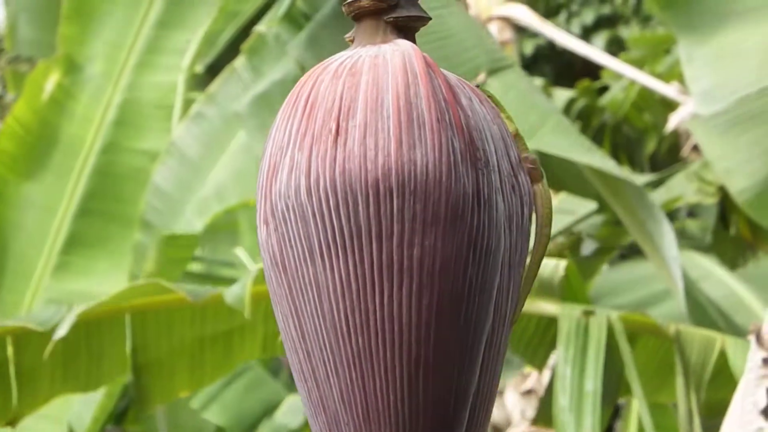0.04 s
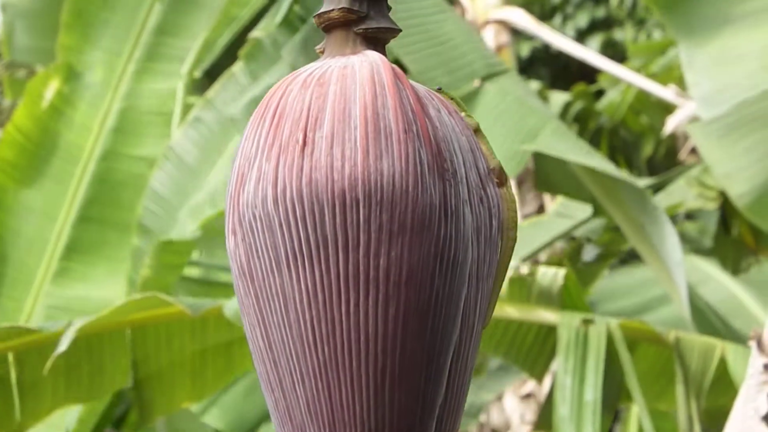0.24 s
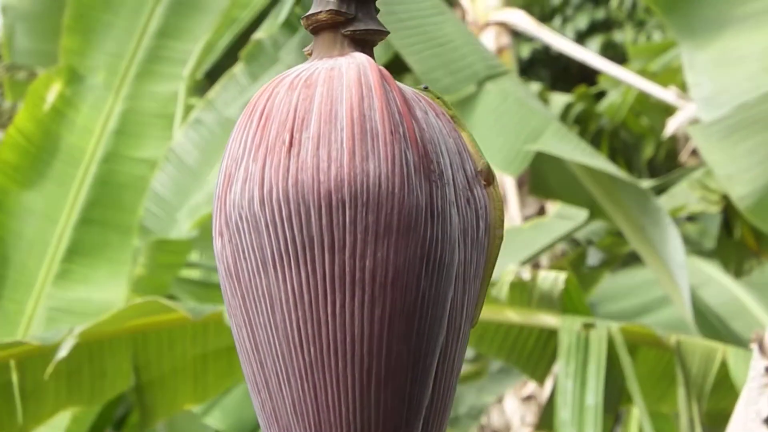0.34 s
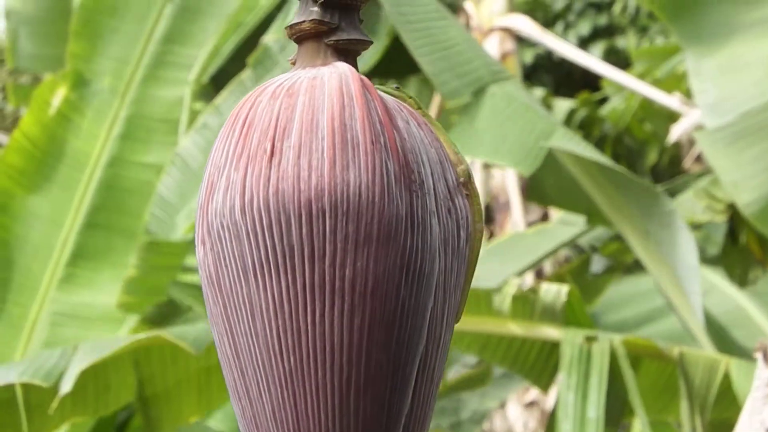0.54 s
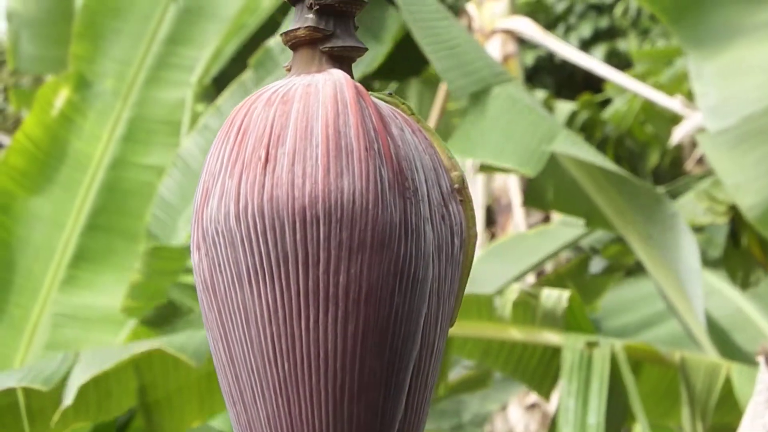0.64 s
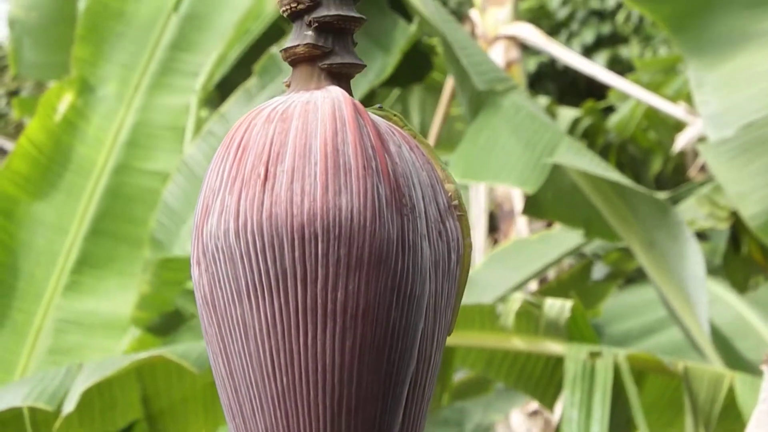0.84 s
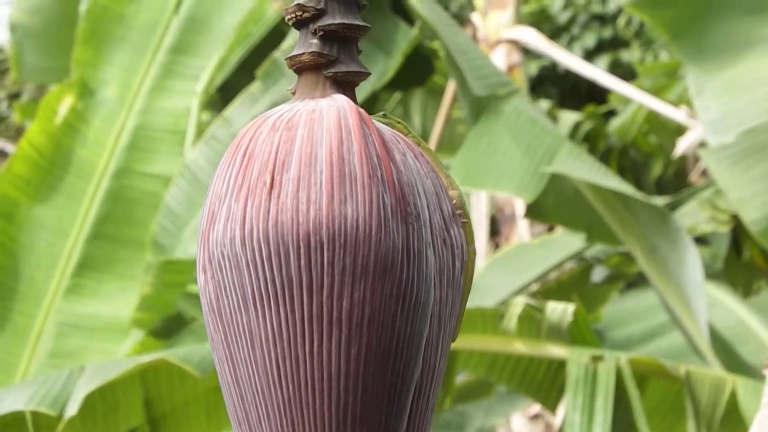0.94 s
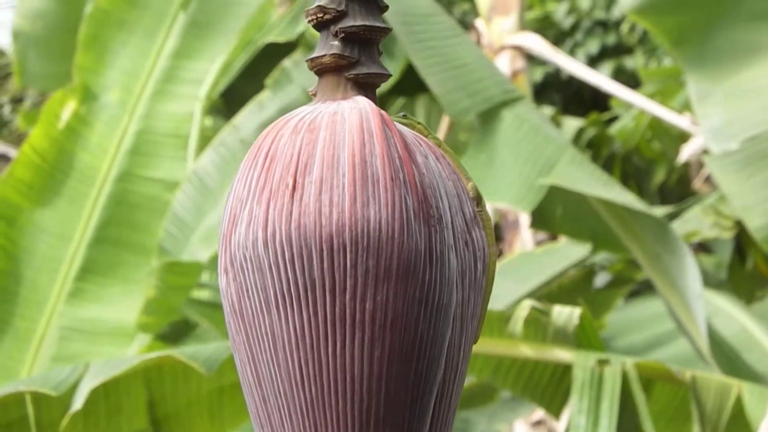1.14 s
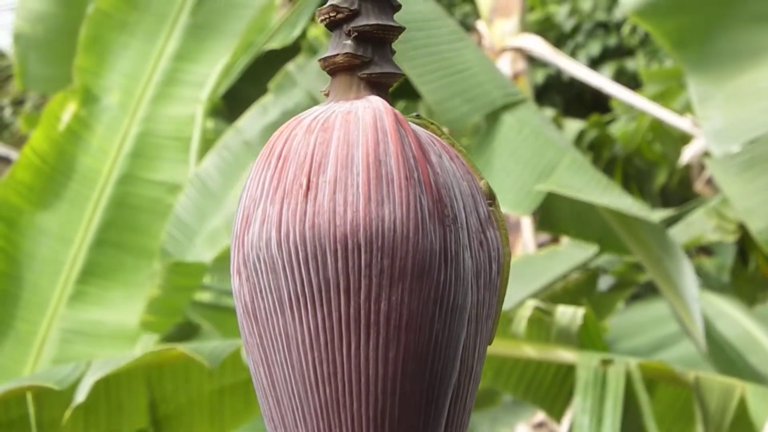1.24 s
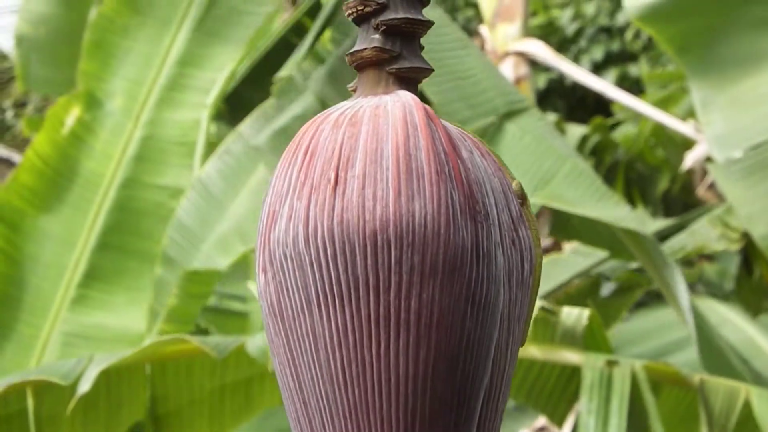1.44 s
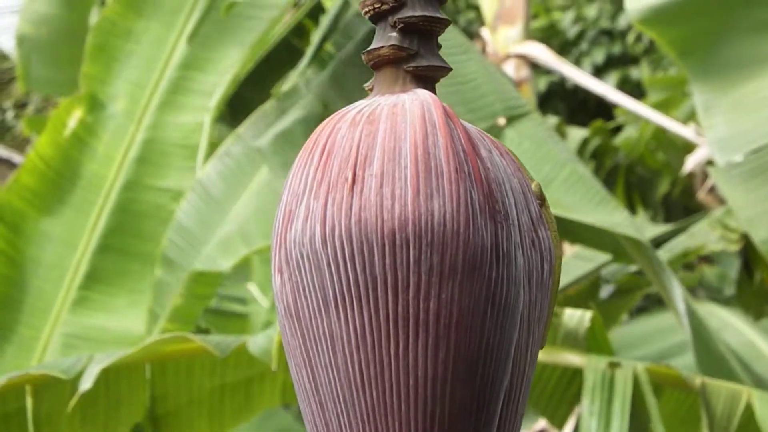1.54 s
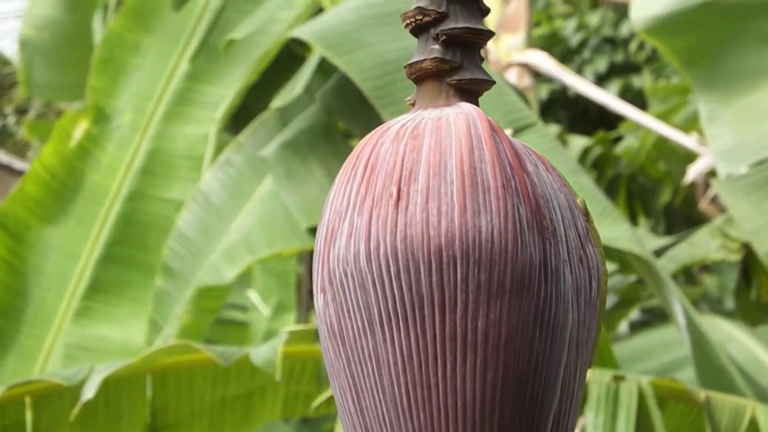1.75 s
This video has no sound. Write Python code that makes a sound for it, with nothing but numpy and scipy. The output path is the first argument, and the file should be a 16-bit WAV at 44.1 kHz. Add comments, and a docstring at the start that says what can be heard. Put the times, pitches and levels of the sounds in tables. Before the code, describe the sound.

Dry leaves scrape twice close to the microphone, with a softer scrape in between. A small snap and faint leafy brushes follow. Outdoors among banana plants, a light breeze and a steady hiss run underneath.

```python
"""Dry leaves in a breeze

Close by among banana plants, dry leaves scrape twice, with a softer scrape in between.
Each scrape is a run of tiny slips that rings the stiff leaf and bounces off the foliage.
A small snap and faint brushes follow, over a wash of air, a wavering drone and microphone hiss."""
import sys
import numpy as np
from scipy import signal
from scipy.fft import rfft, irfft
from scipy.io import wavfile
from scipy.ndimage import uniform_filter1d

SR = 44100
rng = np.random.default_rng(int(sys.argv[2]) if len(sys.argv) > 2 else 0)


def log_audio(samples):
    """Write samples as a 16-bit WAV file to the path given in sys.argv[1]."""
    # one column per channel
    frames = np.atleast_2d(samples).T
    # limit to full scale, then quantise
    limited = np.clip(frames, -1, 1)
    pcm = np.round(limited * 32767).astype(np.int16)
    wavfile.write(sys.argv[1], SR, pcm)


N = 79380
TIME = np.arange(N) / SR
FREQS = np.fft.rfftfreq(2 * N, 1 / SR)


def amp(db):
    """Turns decibels into a gain."""
    return 10 ** (np.asarray(db) / 20)


def unit(x):
    """Scales a signal to an average power of one."""
    return x / np.sqrt(np.mean(x ** 2) + 1e-20)


def read(points, hz=FREQS):
    """Draws a curve through a table's points, with octaves evenly spaced."""
    point_hz, value = np.transpose(points)
    return np.interp(np.log(hz + 1), np.log(point_hz), value)


def colour(x, db):
    """Shapes the tone with a gain curve; white noise keeps its power."""
    log_gain = np.log(np.maximum(unit(amp(db)), 1e-5))
    mirrored = np.r_[log_gain, log_gain[-2:0:-1]]
    response = np.exp(np.conj(signal.hilbert(mirrored)))[:N + 1]  # rings after a sound, never before
    return irfft(rfft(x, 2 * N) * response)[..., :N]


def pair(two, likeness):
    """Makes two unrelated signals partly alike (1 is identical)."""
    return np.array([two[0], likeness * two[0] + np.sqrt(1 - likeness ** 2) * two[1]])


def pan(x, db):
    """Tips a sound to the left by db, one value or one per frequency."""
    sides = amp(np.array([[.5], [-.5]]) * db)
    return irfft(rfft(x, 2 * N) * sides)[..., :N]


# Tone of the hiss (frequency [Hz], relative level [dB])
HISS_TONE = [(20, -18), (100, -10), (1500, -3), (2600, -11), (3800, -1), (8000, -0.5), (12000, 1.5),
             (15500, 1.5)]


def hiss(level_db=-55.5):
    """The microphone hisses steadily."""
    noise = pair(rng.standard_normal((2, N)), likeness=0.18)
    return amp(level_db) * colour(noise, read(HISS_TONE))


# Tone of the breeze (frequency [Hz], relative level [dB])
AIR_TONE = [(20, -45), (40, -28), (56, -4.5), (75, -7), (105, 1.5), (150, -2), (230, -1), (340, -1.5),
            (600, -2), (1100, -3), (1500, -8), (2200, -12), (3500, -14.5), (6000, -16.5), (10000, -25),
            (16000, -15)]


def air(level_db=-59, patch_db=2.7):
    """A distant breeze makes a low wash with drifting louder and softer patches."""
    noise = pair(rng.standard_normal((2, N)), likeness=0.84)
    spectrum = signal.stft(noise, nperseg=1024, noverlap=768)[2]
    patches = uniform_filter1d(rng.standard_normal(spectrum.shape[1:]), size=8, axis=0)  # blur in pitch
    patches = unit(uniform_filter1d(patches, size=16, axis=1))  # blur in time
    wash = signal.istft(spectrum * amp(patch_db * patches), nperseg=1024, noverlap=768)[1][:, :N]
    return amp(level_db) * unit(colour(wash, read(AIR_TONE)))


# How the drone wanders (time [s], pitch [Hz], level [dB])
DRONE_PATH = [(0, 278.8, -72.5), (0.182, 215.1, -66.5), (.27, 260.7, -64.5), (.44, 258.6, -67.5),
              (0.601, 250.3, -67), (.73, 319.9, -70.5), (.85, 218, -65), (.98, 187, -64),
              (1.08, 220.4, -76), (1.21, 178.5, -68), (1.34, 267.8, -60.5), (1.461, 209.4, -78),
              (1.67, 239.4, -71.5), (1.8, 234, -80)]


def drone(width_hz=75):
    """A faint, hollow band of low noise wavers in the distance."""
    times, pitch_hz, level_db = np.transpose(DRONE_PATH)
    rumble = colour(rng.standard_normal((2, N)), -30 * np.log10(1 + (2 * FREQS / width_hz) ** 2))
    phase = 2 * np.pi * np.cumsum(np.interp(TIME, times, pitch_hz)) / SR
    band = rumble[0] * np.cos(phase) + rumble[1] * np.sin(phase)  # lifts the rumble to the pitch
    return amp(np.interp(TIME, times, level_db)) * unit(band)


# Faint leaf touches (loudest moment [s], half length [s], pitch [Hz], band width [Hz], level [dB])
LEAF_BRUSHES = [(0.788, 0.059, 510, 353, -65.5), (1.126, 0.01, 1230, 432, -61),
                (1.143, 0.024, 2970, 270, -65), (1.22, 0.031, 2240, 240, -63.5),
                (1.287, 0.038, 1620, 1296, -66), (1.504, 0.055, 1850, 1300, -65),
                (1.628, .04, 710, 400, -66.5), (1.725, 0.12, 1050, 57, -66), (1.776, 0.012, 3060, 250, -63)]


def brush(middle, half_length, pitch_hz, width_hz, level_db):
    """Soft rubbing swells and fades around one pitch."""
    band_db = -20 * np.log10(1 + (2 * (FREQS - pitch_hz) / width_hz) ** 2)
    rub = colour(rng.standard_normal(N), band_db)
    swell = np.exp(-.5 * ((TIME - middle) / half_length) ** 2)
    return amp(level_db) * swell * rub


# Ticks of a breaking fibre (time [s], level [dB])
SNAP_TICKS = [(1.1352, -43.5), (1.139, -40.5), (1.144, -59)]
# Tone of the ticks (frequency [Hz], relative level [dB])
SNAP_TONE = [(500, -14), (3000, -12), (6500, -20), (7600, -1), (8700, -14), (10000, -17), (15000, -18)]


def snap(decay_s=.0006):
    """A dry fibre gives way in a few bright ticks."""
    force = sum((TIME > at) * amp(db) * np.exp(-abs(TIME - at) / decay_s) for at, db in SNAP_TICKS)
    return colour(force * rng.standard_normal(N), read(SNAP_TONE))


# How long the echoes last (frequency [Hz], time to fade by 60 dB [s])
ECHO_FADE = [(300, 0.4), (1500, 0.43), (5000, 0.29), (9000, 0.33), (15000, 0.19)]
# How alike the echoes are left and right (frequency [Hz], likeness [0 to 1])
ECHO_LIKENESS = [(300, 0.78), (3000, 1), (6500, 0.73), (9000, 0.5), (15000, 0.16)]


def foliage_echoes(x, echo_db=1):
    """Leaves all around add many small echoes; the treble dies soonest and spreads widest."""
    hz, t, spectrum = signal.stft(rng.standard_normal((2, SR // 2)), SR, nperseg=256)
    spectrum = pair(spectrum, read(ECHO_LIKENESS, hz)[:, None])
    fade = amp(-60 * t / read(ECHO_FADE, hz)[:, None])
    tail = signal.istft(spectrum * fade, SR)[1]
    echoes = signal.fftconvolve(x[None], tail / np.linalg.norm(tail[0]), axes=1)[:, :N]
    return (x + amp(echo_db) * echoes) / np.sqrt(1 + amp(echo_db) ** 2)


def friction(slips_per_s=6000, spread_db=0.5, rub_share=0.62):
    """A sliding leaf makes tiny random slips mixed with smooth rubbing."""
    slips = (rng.random(N) < slips_per_s / SR) * rng.choice([-1, 1], N)
    sizes = amp(spread_db * np.minimum(rng.exponential(1, N), 4))
    return np.sqrt(1 - rub_share) * unit(slips * sizes) + np.sqrt(rub_share) * rng.standard_normal(N)


# Broad tone of the leaf (frequency [Hz], relative level [dB])
LEAF_TONE = [(150, -31), (500, -31.5), (820, -20.5), (1150, -12.5), (1430, -13), (1720, -9.5), (2150, -17),
             (2700, -16.5), (3150, -10.5), (4050, -5), (4500, -7.5), (5000, -2), (5400, -3.5), (6400, 1.5),
             (7300, -5), (8300, -8), (10500, -5.5), (11700, -11.5), (12500, -17), (15500, -20)]
# Sharp peaks and dips in the leaf's ring (frequency [Hz], boost [dB])
LEAF_RINGS = [(1157, 7.5), (3150, 14), (3606, 10), (4021, 9), (4102, 2.5), (4295, 8.5), (4814, 3),
              (4980, 3), (5070, 2.5), (5752, 2), (5882, -9), (6114, -1), (6560, 5.5), (6855, -5),
              (7336, 9.5), (8797, 7)]
# The scrapes (start [s], rise time [s], time until fading [s], level [dB], treble tilt [dB per octave])
LEAF_SCRAPES = [(0.2198, 0.00078, 0.062, -36.5, 0), (0.338, .01, 0.063, -47.5, -2.5),
                (0.683, 0.0031, 0.067, -36.5, 0)]


def scrape(start, rise, length, level_db, tilt_db, grip_s=0.012, release_s=0.022, ring_width_hz=30):
    """Friction rings the stiff leaf: it catches, brightens as it gathers speed, then lets go."""
    age = TIME - start
    grip = 1 - np.clip(age / grip_s, 0, 1)
    rub = friction()
    treble = irfft(rfft(rub, 2 * N) / (1 + (8000 / (FREQS + 1)) ** 8))[:N]
    rub = rub + treble * (amp(-8 * grip) - 1)  # duller while the leaf grips
    onset = np.clip(age / rise, 0, 1)
    release = np.exp(-np.maximum(age - length, 0) / release_s)
    force = onset * amp(level_db - 0.5 * grip) * release
    ring_db = sum(boost / (1 + (2 * (FREQS - hz) / ring_width_hz) ** 2) for hz, boost in LEAF_RINGS)
    return colour(rub * force, read(LEAF_TONE) + ring_db + tilt_db * np.log2(FREQS + 1))


# How far the leaf sounds lean left (frequency [Hz], left minus right [dB])
LEAF_PAN = [(200, 0), (1300, 3.5), (2500, 3), (4400, 3.5), (8000, -0.1), (15000, 3.5)]


def scene():
    """Leaves, breeze and drone sit a little to the left, over the hiss."""
    scrapes = foliage_echoes(sum(scrape(*row) for row in LEAF_SCRAPES))
    brushes = sum(brush(*row) for row in LEAF_BRUSHES)
    leaves = pan(scrapes + brushes + snap(), read(LEAF_PAN))
    return leaves + pan(air() + drone(), db=3.5) + hiss()


def record(dry, notch_hz=2508, top_hz=15700):
    """The camera cuts a deep notch in the upper middle tones and removes the highest treble."""
    for width_hz in (356, 135):
        dry = signal.lfilter(*signal.iirnotch(notch_hz, notch_hz / width_hz, SR), dry)
    lowpass = signal.firwin(511, top_hz, window=("kaiser", 9), fs=SR)
    return signal.oaconvolve(dry, lowpass[None], "same")


dry = scene()
out = record(dry)
log_audio(out)
```